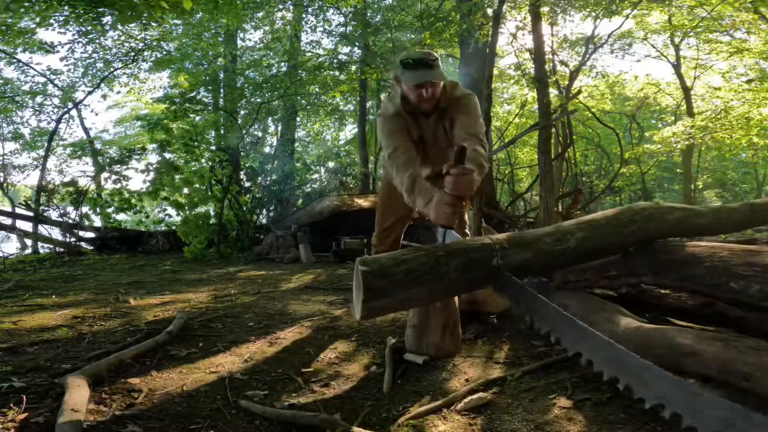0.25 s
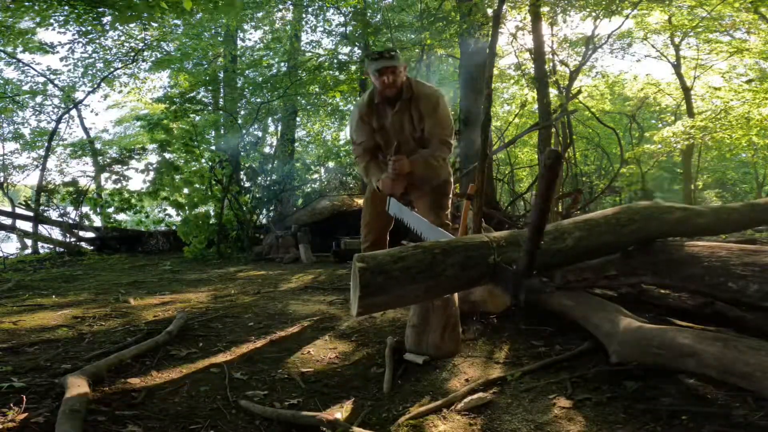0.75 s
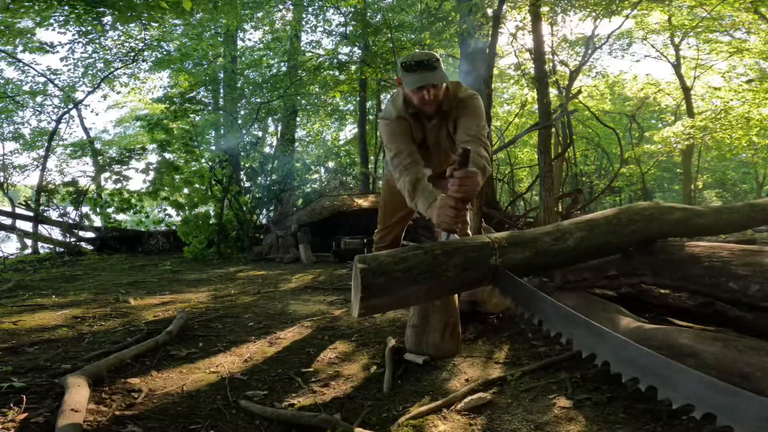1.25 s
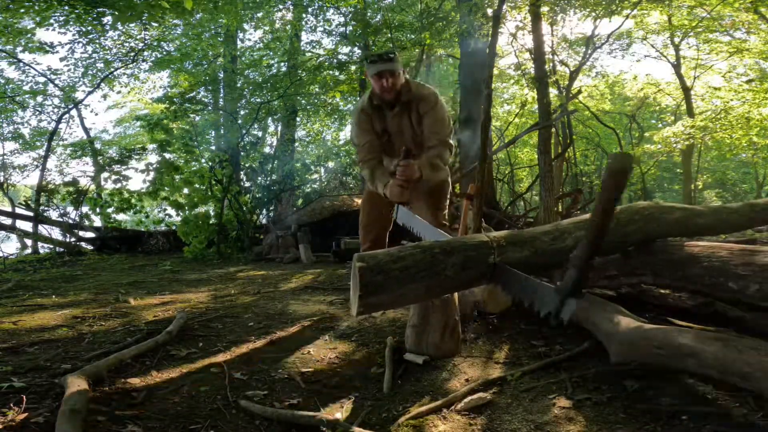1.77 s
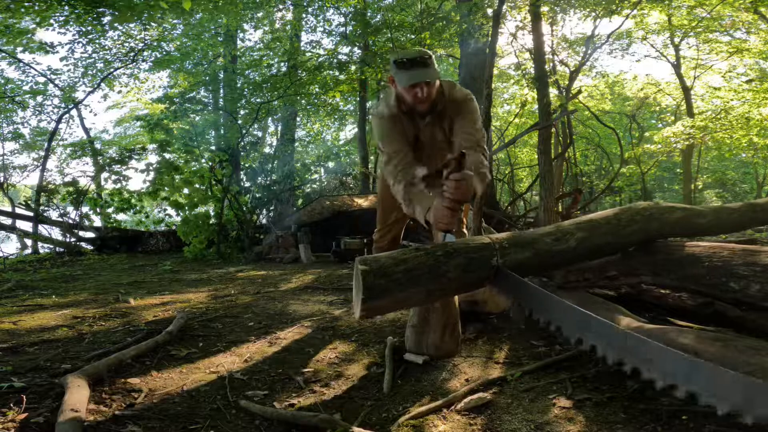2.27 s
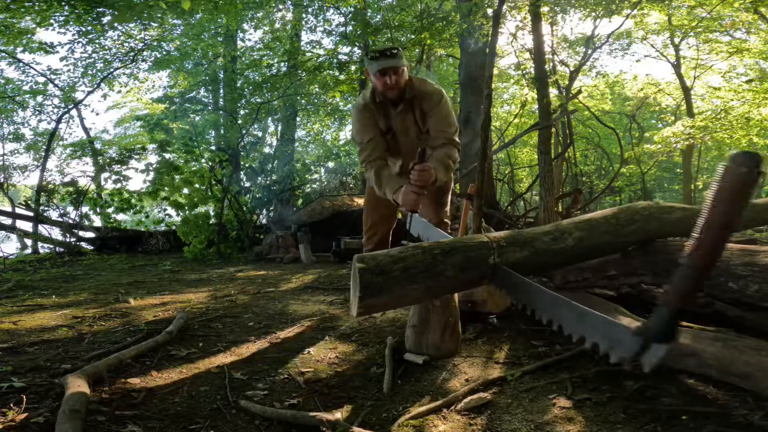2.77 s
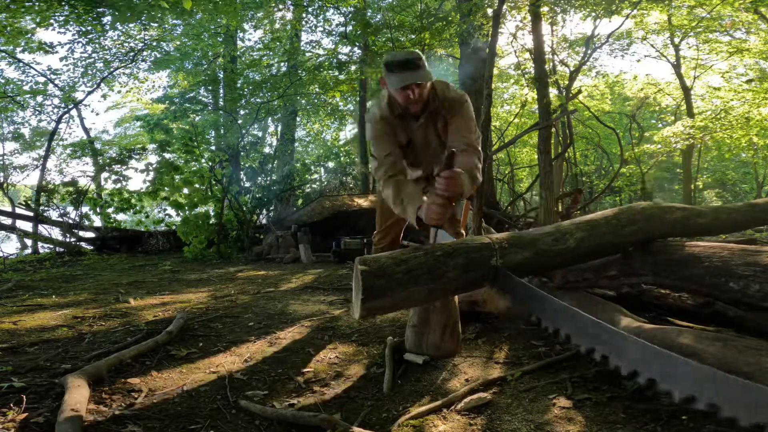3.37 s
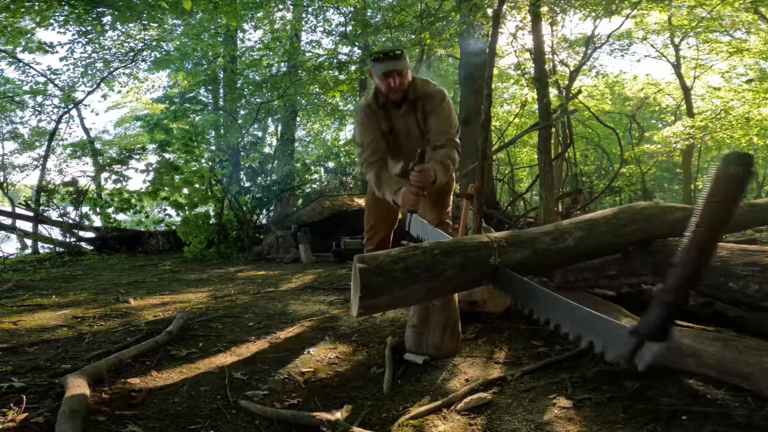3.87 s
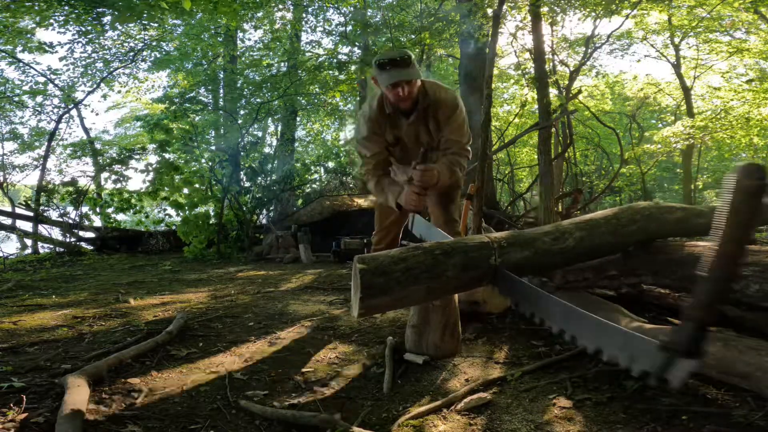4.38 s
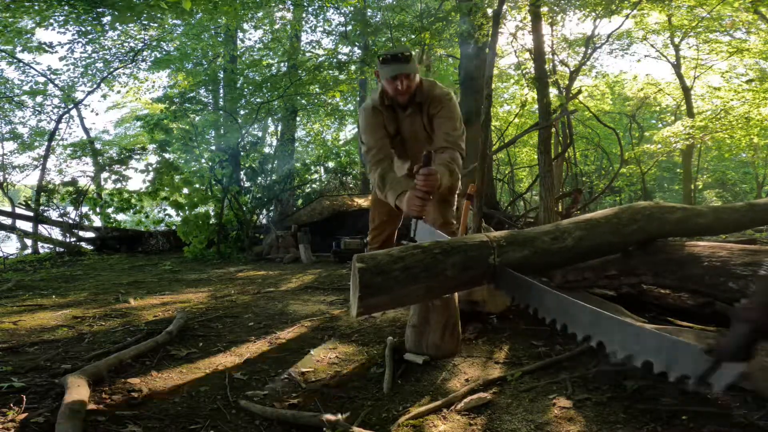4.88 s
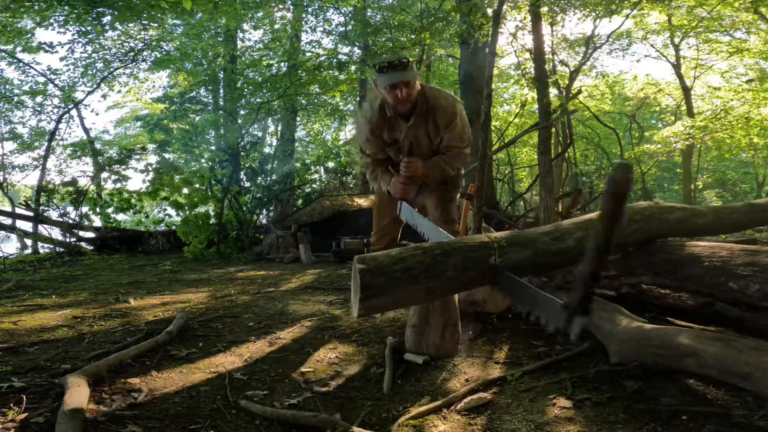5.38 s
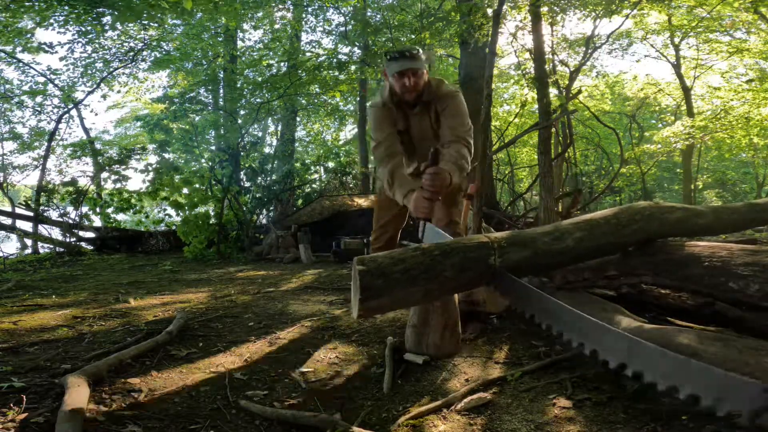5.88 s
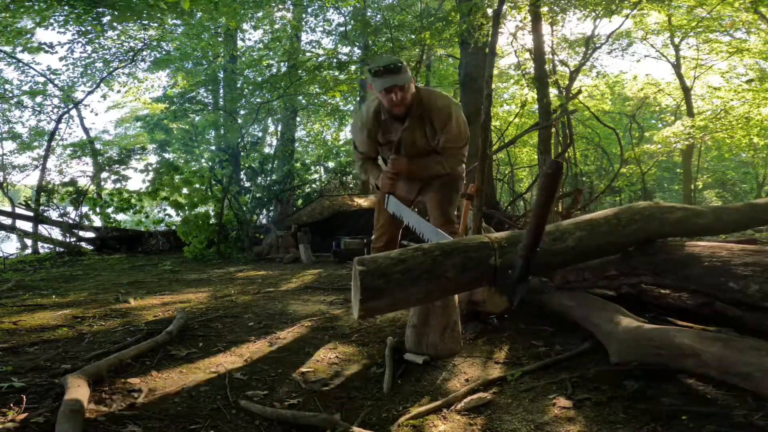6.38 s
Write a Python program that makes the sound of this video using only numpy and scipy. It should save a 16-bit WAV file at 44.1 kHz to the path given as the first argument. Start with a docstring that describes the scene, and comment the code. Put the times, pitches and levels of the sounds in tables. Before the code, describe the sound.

A large crosscut saw works through a log in a wood, heard close and dry in stereo. Each loud, gritty push lasts about half a second and ends with a thin metallic ring; a softer, uneven pull follows. Small wooden knocks mark some turns, the log rumbles low, and leaves rustle barely audibly.

```python
"""Crosscut saw in a wood

A long two-handled saw is pushed and pulled through a log, its blade tapping the kerf near the turns.
Teeth tear fibres: bursts of noise, shaped by stroke speed, excite wood, blade modes and log in turn.
With most of the blade out of the cut, lightly damped partials (decaying sines) sing through the turn.
Leaves rustle faintly; trunks and ground scatter the sound, as exponentially decaying noise.
"""
import sys
import numpy as np
from scipy import signal
from scipy.fft import rfft, irfft, next_fast_len
from scipy.io import wavfile
from scipy.ndimage import uniform_filter1d, map_coordinates

SR = 44100
rng = np.random.default_rng(int(sys.argv[2]) if len(sys.argv) > 2 else 0)


def output_pcm(signal):
    """Save a mono or channel-first signal as 16-bit PCM at the path in sys.argv[1].

    Samples are clipped to [-1, 1] before scaling.
    """
    pcm = np.clip(np.atleast_2d(signal).T, -1, 1) * 32767
    wavfile.write(sys.argv[1], SR, np.round(pcm).astype(np.int16))


N = 292810
T = np.arange(N) / SR  # time [s]

# Pushes, blade sliding out: (start [s], speed-up [s], full swing [s], slow-down [s], tooth sizzle [dB],
# log rumble [dB], blade song [dB], low partials relative to song [dB])
PUSH_STROKES = [(-.041, 0.11, 0.22, 0.094, -29, -31, -35.5, -3),
                (.967, 0.1, 0.27, 0.082, -29.5, -31.5, -35.5, 1),
                (2.033, 0.12, 0.26, 0.12, -30.5, -31, -34, -1),
                (3.14, 0.12, .27, 0.12, -31.5, -30, -38.5, 8),
                (4.257, 0.14, 0.23, 0.11, -30, -29, -37.5, -4),
                (5.334, 0.12, 0.23, 0.12, -29.5, -29, -31.5, -2),
                (6.429, 0.085, 0.23, 0.029, -29, -23.5, -29.5, -13)]
# Pulls, blade drawn back: (start [s], speed-up [s], full swing [s], slow-down [s], tooth sizzle [dB],
# log rumble [dB])
PULL_STROKES = [(.371, 0.11, 0.38, 0.1, -38, -43.5), (1.375, 0.19, 0.36, 0.18, -38.5, -36.5),
                (2.498, 0.16, 0.39, 0.15, -38, -36.5), (3.646, 0.085, 0.41, 0.16, -38.5, -39.5),
                (4.673, 0.22, 0.32, 0.15, -39, -42), (5.668, 0.28, 0.31, 0.21, -39.5, -37.5)]


def saw():
    """Source-filter principle: tearing noise excites the teeth's sizzle, the blade modes and the wood."""
    # Blade modes damped by the kerf: (frequency [Hz], width [Hz], relative level [dB])
    free_blade = [(3340, 46, -12.5), (3500, 60, -1.5), (3747, 59, 0.5), (3925, 240, -7), (4011, 57, 1),
                  (5580, 44, -5), (563, 6.8, -8)]
    stiff_blade = [(4370, 56, 2.5), (4529, 75, -1.5), (5270, 67, -17), (5490, 48, -14), (5818, 95, -3.5),
                   (6227, 102, -5), (6427, 73, -2), (7496, 170, -8.5), (8590, 260, -19.5),
                   (10240, 68, -14.5), (11260, 61, -16.5)]
    # Spectra of the teeth and of the wood: (frequency [Hz], relative level per Hz [dB])
    sizzle_spectrum = [(3000, -9), (4200, 7), (6000, -0.5), (7000, -5), (8500, 0.5), (10000, -4.5),
                       (12000, -10), (14000, -15), (15700, -33)]
    wood_spectrum = [(120, -16), (200, -2), (250, -6.5), (372, -3.5), (505, -8), (568, -1), (640, -8),
                     (760, -4.5), (1500, -6.5), (3200, -5.5), (4500, -24.5), (7000, -28), (9000, -60)]

    teeth_db = sizzle_db()
    out = share_out()
    full_db = -25  # sizzle of a hard stroke
    drop = np.maximum(full_db - teeth_db, 0)

    # share of the sizzle's drop that the wood is spared, blade in and out
    spared_in, spared_out = 0.39, 0.17
    wood_db = 1 + drop * (spared_in + (spared_out - spared_in) * out)

    # modes are loudest with a little more than half the blade out
    midway_db = 6 * np.sin(np.pi * out ** 1.15) ** 2
    # far out, the blade rings on: a share of a deep drop is made up
    rings_on_db = 0.19 * (0.21 + out) * np.maximum(drop - 14, 0)
    blade_db = 4.5 + midway_db + rings_on_db

    judder = amp(1.74 * wobble(14) + 0.96 * wobble(30))  # tooth groups bite unevenly
    teeth = amp(teeth_db) * judder
    wood = amp(teeth_db + wood_db) * judder
    blade = amp(teeth_db + blade_db) * judder
    extra = catches()
    # the free modes need length: strongest when the blade is far out
    reach = np.max([np.exp(-np.abs(T - swing_end(row) - .05) / 0.39) for row in PUSH_STROKES], axis=0)

    sizzle_gain = teeth * amp(2 + 1.7 * wobble(18)) + 3.96 * extra
    sizzle = through(sizzle_gain * tearing(grit_db=2.0, patchy_db=4.5), colour(sizzle_spectrum))

    stiff_gain = blade * amp(-2.0) + 2.7 * extra
    stiff = through(stiff_gain * tearing(grit_db=5.0, patchy_db=2), modes(stiff_blade))

    free_gain = blade * amp(-9.5 + 7.5 * reach)
    free = through(free_gain * tearing(grit_db=4.0, patchy_db=2.0), modes(free_blade))

    fibre_gain = wood * amp(-0.68) + 1.38 * extra
    fibres = through(fibre_gain * tearing(grit_db=2.0, patchy_db=3.24), colour(wood_spectrum))
    return sizzle + stiff + free + fibres


def sizzle_db():
    """Stroke kinematics: the loudest stroke rules, above the faint creep of a turning blade."""
    pushes = [stroke_db(row, arch_db=18, crest=0.32, bend_up=1.83, bend_down=0.58) for row in PUSH_STROKES]
    pulls = [stroke_db(row, arch_db=1.88, crest=0.46, bend_up=1.79, bend_down=1.35) for row in PULL_STROKES]
    creep_db = -71
    return 20 * np.log10(amp(np.max(pushes + pulls, axis=0)) + amp(creep_db))


def stroke_db(row, arch_db, crest, bend_up, bend_down):
    """Speed-dependent excitation: level climbs with the start, arches over the swing, falls at the end."""
    start, rise, swing, fall, db = row[:5]
    t = T - start
    slow_start = np.maximum(1 - t / rise, 0) ** bend_up
    slow_end = np.maximum((t - rise - swing) / fall, 0) ** bend_down
    arch = arch_db * (np.clip((t - rise) / swing, 0, 1) - crest) ** 2  # crest as share of the swing
    still_db = 46.5  # drop at a standstill
    return db - arch - still_db * (slow_start + slow_end)


def swing_end(row):
    """Stroke kinematics: the moment at which a stroke begins to slow down."""
    return sum(row[:3])


def share_out():
    """Reciprocating motion: share of the blade beyond the cut, linear between the turns."""
    push_starts = [(row[0], 0) for row in PUSH_STROKES]
    pull_starts = [(row[0], 1) for row in PULL_STROKES]
    last_turn = (sum(PUSH_STROKES[-1][:4]), 1)
    turns = sorted(push_starts + pull_starts + [last_turn])
    return np.interp(T, *np.transpose(turns))


def tearing(grit_db, patchy_db):
    """Stochastic fracture: fibres snap in uneven bursts; bands come and go as the blade slides."""
    z = signal.stft(rng.standard_normal(N), nperseg=512)[2]
    field = uniform_filter1d(rng.standard_normal(z.shape), 3, 0)  # smooth over frequency
    field = uniform_filter1d(field, 8, 1)  # smooth over time
    patches = amp(patchy_db * np.clip(unit(field), -2, 2))
    noise = signal.istft(z * patches, nperseg=512)[1][:N]
    return unit(noise * amp(grit_db * wobble(1400)))


def catches():
    """Impulsive excitation: teeth catch in the kerf; each extra tear rises quickly and falls shortly."""
    # Extra tears: (time [s], relative level [dB])
    catch_times = [(0.491, -32), (0.584, -27.5), (0.673, -33), (0.714, -31), (0.83, -34), (1.442, -49),
                   (1.478, -51), (1.529, -30.5), (1.6352, -48), (1.6825, -30), (1.772, -30.5), (1.844, -29),
                   (1.8961, -32), (2.589, -42), (2.716, -35), (2.806, -25.5), (3.0061, -33), (3.681, -55),
                   (3.7943, -36.5), (3.915, -33), (4.13, -30.5), (4.785, -44), (4.868, -30),
                   (4.9631, -32.5), (5.0624, -31.5), (5.118, -28), (5.1974, -34), (5.772, -52),
                   (5.828, -55), (5.888, -46), (5.943, -26.5), (6.0347, -34), (6.11, -28.5), (6.1814, -38),
                   (6.2477, -31.5), (6.331, -37.5)]
    s, db = np.transpose(catch_times)
    u = np.maximum(T - s[:, None], 0) / .009  # time in units of the rise, 9 ms
    return amp(db - 13.5) @ (u * np.exp(1 - u))


def song():
    """Free vibration: partials build up late in the push, ring through the turn, fade as the cut grips."""
    # Free blade partials: (frequency [Hz], relative level [dB], free 60 dB decay time [s])
    high_partials = [(5539, 0, 1.0), (4490, -15, .25), (4350, -18, .3), (6428, -24, .25), (7340, -18, .15)]
    low_partials = [(3340, 0, .45), (3380, -6, .5), (3478, -12, .5), (3515, -12, .5), (3775, -11, .55),
                    (4025, -10, .6), (568, -8, .2)]
    out = np.zeros(N)
    for row in PUSH_STROKES:
        db, low_db = row[6:]
        # both sets peak just before the push slows, by lead [s]
        for table, lift_db, lead in ((high_partials, 0, 0.033), (low_partials, low_db, 0.04)):
            t = T - swing_end(row) + lead
            rise = np.exp(np.minimum(t, 0) / .085)  # build-up time constant [s]
            after = np.maximum(t, 0)
            gripped_db = -90 * np.maximum(after - .3, 0)  # faster decay once drawn in
            for hz, level_db, t60 in table:
                chance = rng.standard_normal(2)
                start_db = db + lift_db + level_db + 1.1 * chance[0]
                gain = amp(start_db - 60 * after / t60 + gripped_db)
                out += rise * gain * np.sin(2 * np.pi * hz * T + 3 * chance[1])
    return out * amp(2.9 * wobble(25))


def taps():
    """Impact: the blade taps the kerf; noise in one broad resonance, with a faint tick of steel."""
    # Taps near a turn: (time [s], knock level [dB], centre [Hz], relative level of steel tick [dB])
    tap_times = [(0.383, -28, 2000, -15), (0.8914, -18, 1900, -31), (0.917, -27, 1050, -28),
                 (0.9612, -32.5, 1500, -12), (1.9666, -20, 1790, -27), (1.9984, -33, 2760, -17),
                 (2.0384, -33.5, 1020, -13), (2.549, -26.5, 3380, -21), (3.1483, -28.5, 1150, -17),
                 (3.6581, -31, 3380, -15), (4.2996, -18.5, 1850, -33), (4.714, -35, 1670, -11),
                 (5.3316, -30.5, 2760, -16), (6.452, -32, 1405, -9)]
    out = np.zeros(N + SR)
    t = np.arange(SR // 20) / SR
    for s, db, hz, tick_db in tap_times:
        # 60 dB decay times [s] of the knock's noise and of the tick
        puff = rng.standard_normal((2, len(t))) * amp(-60 * t / [[.03], [.012]])
        resonance = np.sin(2 * np.pi * hz * t) * amp(-60 * t / 0.0025)
        knock = signal.fftconvolve(puff[0], resonance)[:len(t)]
        tick = amp(tick_db - 17) * puff[1]
        out[round(s * SR):][:len(t)] += amp(db) * (knock / np.abs(knock).max() + tick)
    return out[:N]


def log():
    """Forced vibration: the log and its pile shudder more through each stroke and settle at the turn."""
    # Spectrum of the shudder: (frequency [Hz], relative level per Hz [dB])
    log_spectrum = [(13, -36), (22, -1), (59, -1), (114, 2.5), (130, 4), (167, -9.5), (220, -10.5),
                    (260, -14.5), (340, -11.5), (570, -120)]
    quiet_db, crest = -42.5, 0.71  # level at the turns; time of the crest as share of the stroke
    points = []
    for row in sorted(PUSH_STROKES + PULL_STROKES):
        points += [(row[0], quiet_db), (row[0] + crest * sum(row[1:4]), row[5])]
    rumble_db = np.interp(T, *np.transpose(points))
    rumble = unit(filtered(rng.standard_normal(N), colour(log_spectrum)))
    return amp(rumble_db + 2.0 * wobble(23)) * rumble


def forest():
    """Stationary random noise: a faint steady rustle of leaves."""
    # Spectrum of the rustle: (frequency [Hz], relative level per Hz [dB])
    forest_spectrum = [(150, -5), (400, -11), (1000, -23), (3000, -30), (6000, -34), (11000, -44),
                       (15000, -55)]
    return amp(-61) * unit(filtered(rng.standard_normal(N), colour(forest_spectrum)))


def ports(make):
    """Interchannel coherence: a shared sound with level and phase offsets, plus a little that differs."""
    # Left-right likeness: (frequency [Hz], correlation [1])
    alike = [(60, .97), (600, .98), (2500, .9), (5000, .95), (12000, .84)]
    # Lean: (frequency [Hz], left above right [dB])
    lean = [(80, 0.5), (600, -1.5), (2900, -2.5), (4100, -3), (5300, -2), (8900, -0.5), (11000, -0.5)]
    # Lead: (frequency [Hz], phase by which left leads [rad])
    lead = [(80, 0), (1000, -.16), (3400, -.73), (4300, -.6), (5300, -.1), (8000, -.2), (12000, 0)]

    def share(hz):
        """Orthogonal mixing: cos and sin gains of mid and side set the correlation."""
        turn = np.arccos(along(alike, hz)) / 2
        return np.array([np.cos(turn), np.sin(turn)])

    def offset(hz):
        """Symmetric offset: half the lean and lead to the left, the inverse to the right."""
        half = amp(along(lean, hz) / 2) * np.exp(1j * along(lead, hz) / 2)
        return np.array([half, 1 / half])

    mid, side = filtered(np.array([make(), make()]), share)
    return filtered(np.array([mid + side, mid - side]), offset)


def trees(x):
    """Diffuse scattering off trunks and ground: decaying noise, unrelated in the two channels."""
    # Decay of the scatter: (frequency [Hz], 60 dB decay time [s])
    decay_times = [(200, 0.12), (2000, 0.18), (10000, 0.24)]
    hz, t, z = signal.stft(rng.standard_normal((2, SR // 2)), SR, nperseg=256)
    decay = amp(-60 * t / along(decay_times, hz)[:, None])
    tail = signal.istft(z * decay, SR, nperseg=256)[1]
    delayed = np.pad(x, (300, 0))[None]  # 300 samples, about 7 ms
    return signal.fftconvolve(delayed, tail / np.linalg.norm(tail[0]), axes=1)[:, :N]


def amp(db):
    """Logarithmic level: dB to amplitude gain."""
    return 10 ** (np.asarray(db) / 20)


def unit(x):
    """Power normalisation: scaled to rms 1."""
    return x / np.sqrt(np.mean(x ** 2) + 1e-20)


def along(points, hz):
    """Logarithmic frequency scale: (frequency [Hz], value) points joined on a log axis."""
    f, v = np.transpose(points)
    return np.interp(np.log(hz + 1), np.log(f + 1), v)


def wobble(rate):
    """Band-limited fluctuation: a smooth curve through clipped random knots, rate knots a second."""
    knots = np.clip(rng.standard_normal(int(N * rate / SR) + 4), -2, 2)
    return map_coordinates(knots, [T * rate])


def filtered(x, response):
    """Linear filtering: the spectrum of x times a complex response of frequency."""
    m = next_fast_len(N + SR // 2)
    return irfft(rfft(x, m) * response(np.fft.rfftfreq(m, 1 / SR)), m)[..., :N]


def through(x, response):
    """Power conservation: filtering that keeps the power of white noise."""
    hz = np.linspace(0, SR / 2, 8192)
    return filtered(x, response) / np.sqrt(np.mean(np.abs(response(hz)) ** 2))


def modes(table):
    """Modal superposition: a sum of damped resonances of alternating sign."""
    def response(f):
        total = 0
        for k, (centre, width, db) in enumerate(table):
            damping = 1j * f * width
            total = total + (-1) ** k * amp(db) * damping / (centre * centre - f * f + damping)
        return total
    return response


def colour(spectrum):
    """Spectral shaping: the response of a smooth spectrum."""
    return lambda f: amp(along(spectrum, f))


def scene():
    """Superposition: saw, log and leaves as direct sound, with scatter from the trees."""
    near = ports(lambda: saw() + song() + taps() + log() + forest())
    return near + amp(-27) * trees(near.mean(axis=0))


def record(dry):
    """Band limitation: nothing above the limit [Hz] is kept."""
    return filtered(dry, lambda hz: hz < 15725)


dry = scene()
out = record(dry)
output_pcm(out)
```